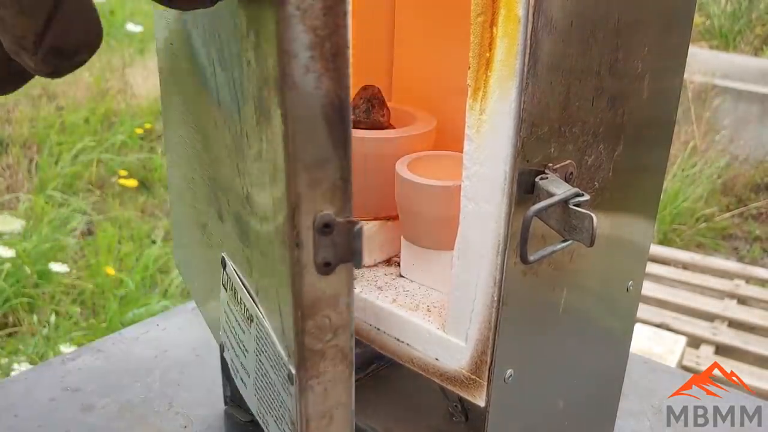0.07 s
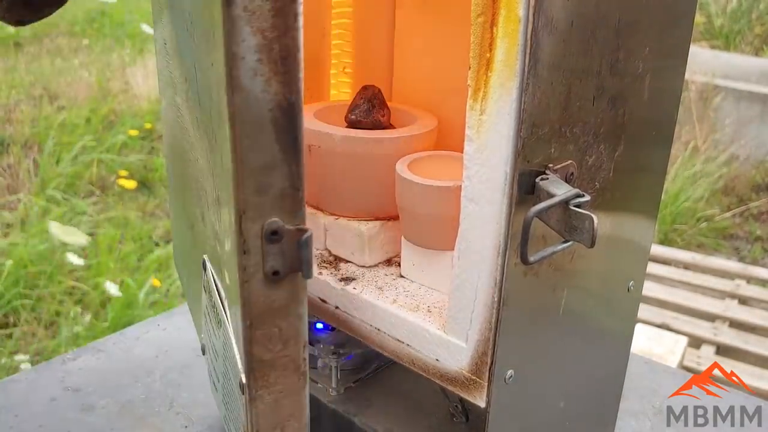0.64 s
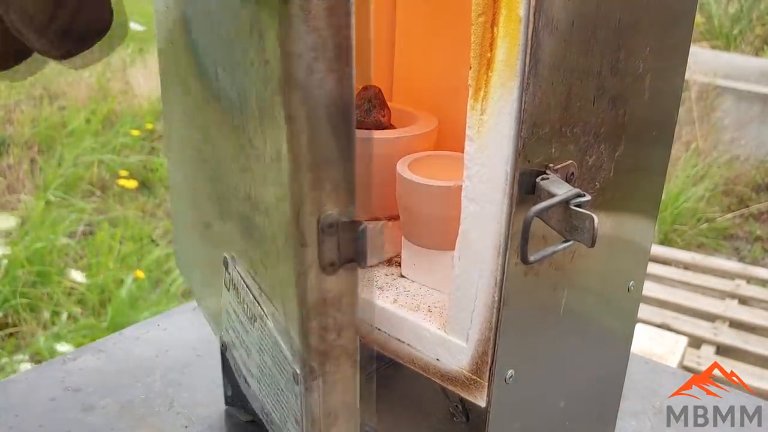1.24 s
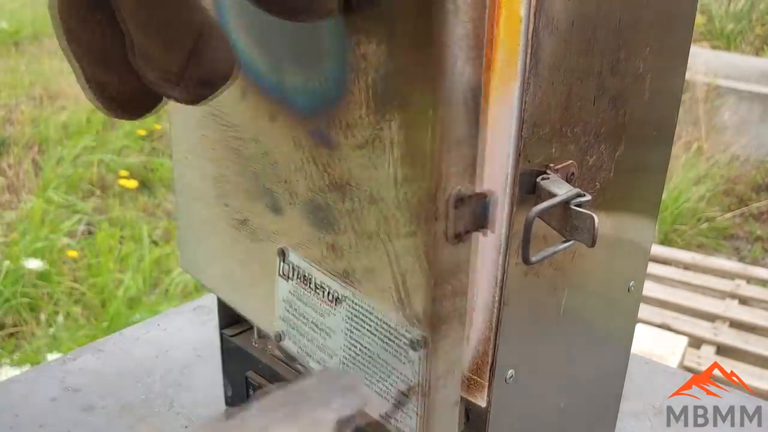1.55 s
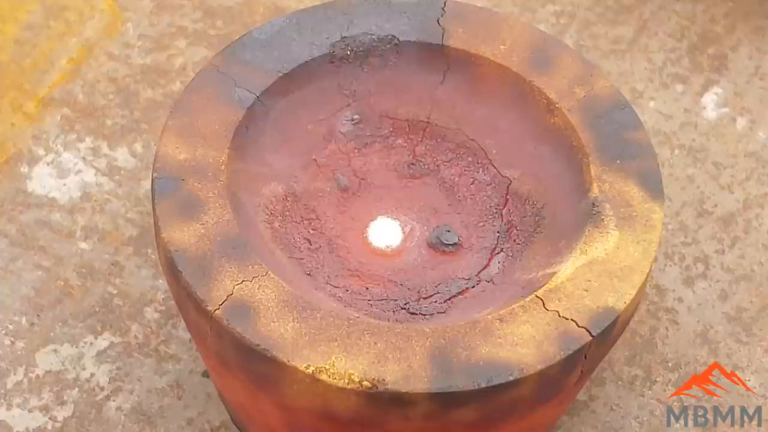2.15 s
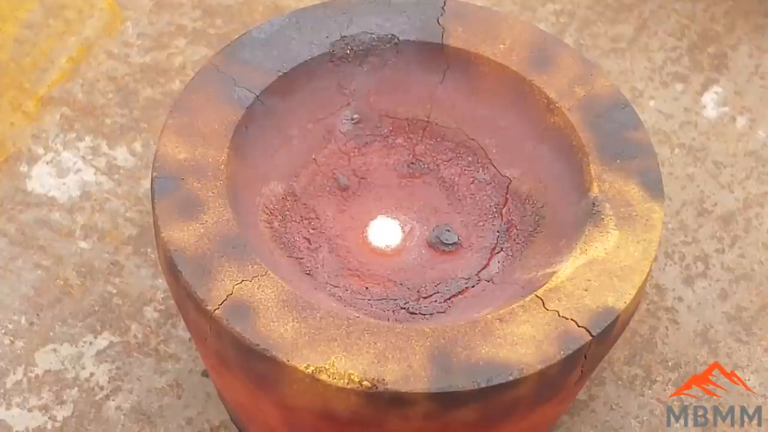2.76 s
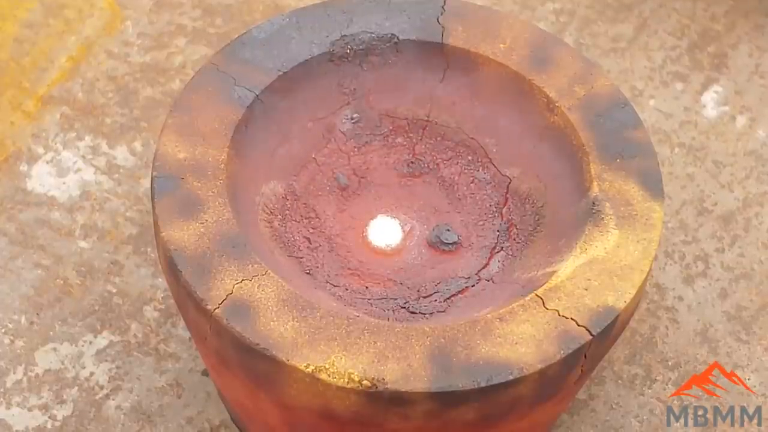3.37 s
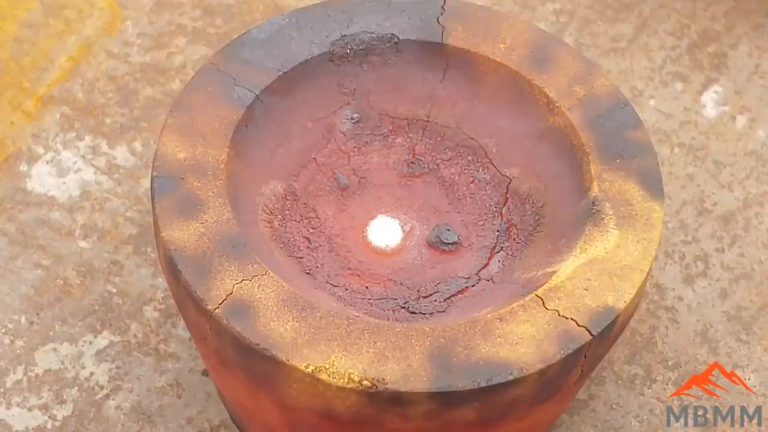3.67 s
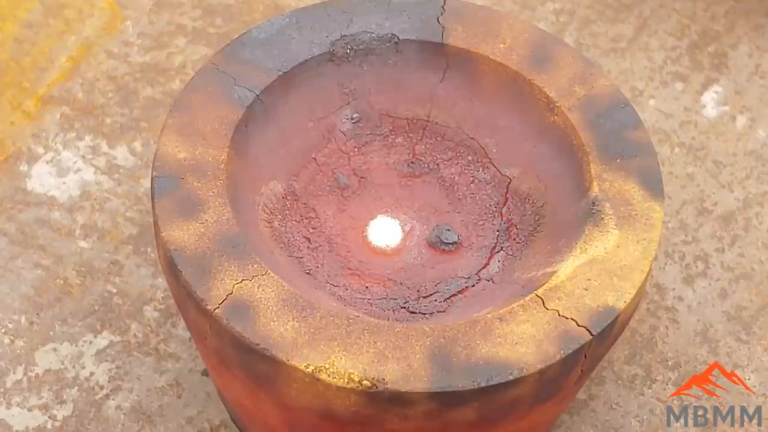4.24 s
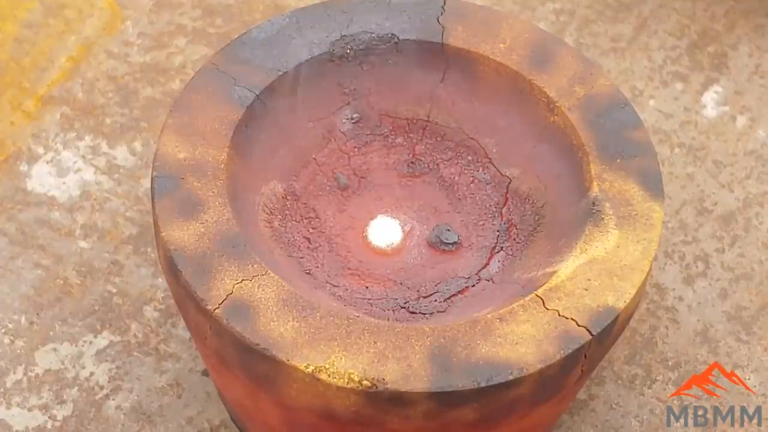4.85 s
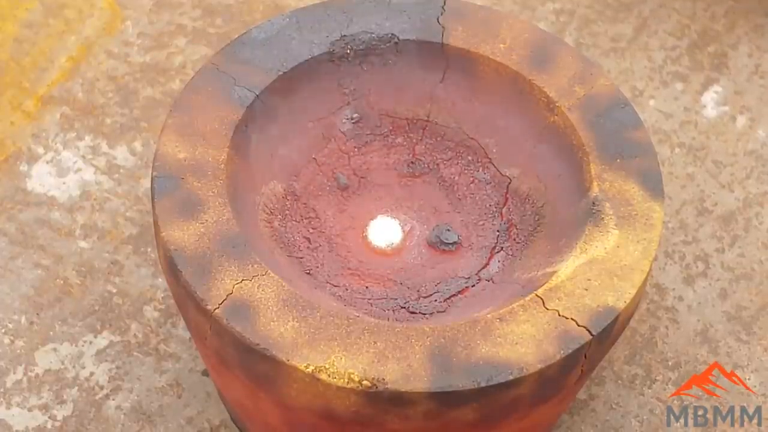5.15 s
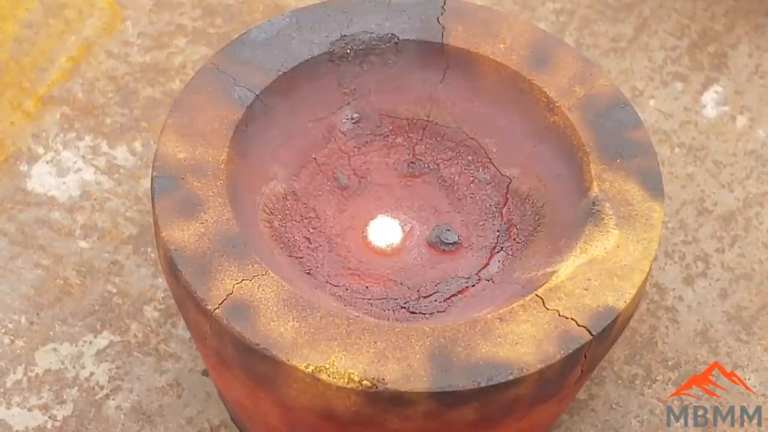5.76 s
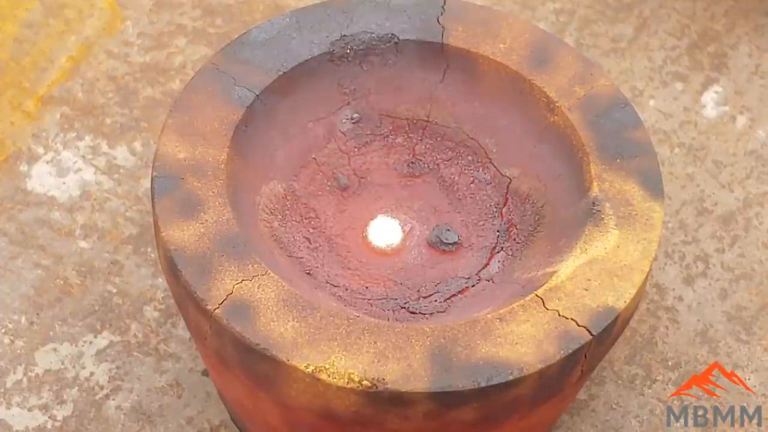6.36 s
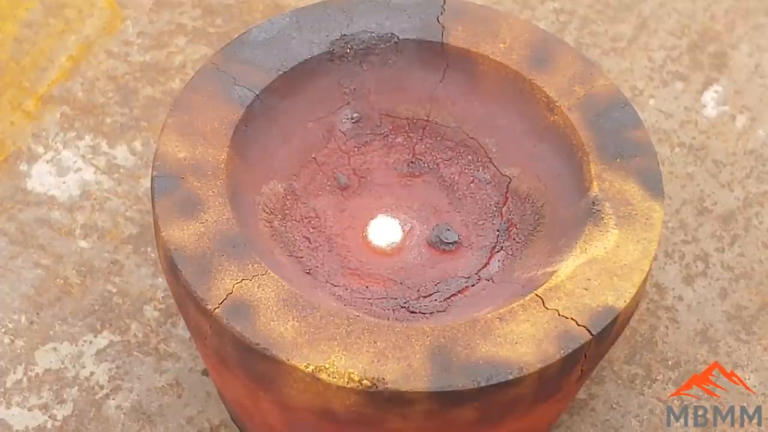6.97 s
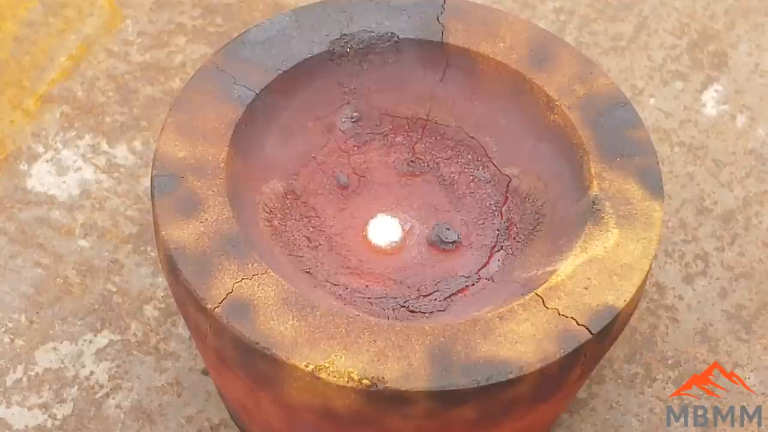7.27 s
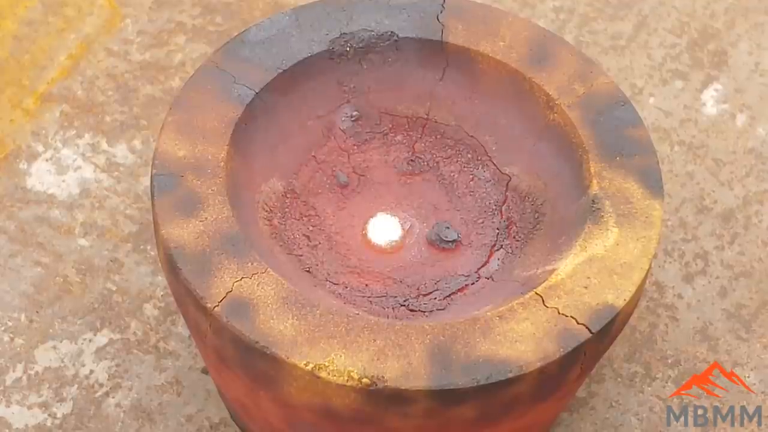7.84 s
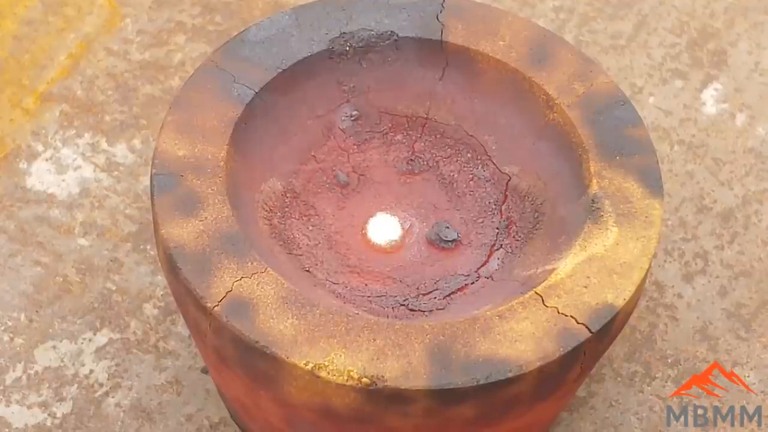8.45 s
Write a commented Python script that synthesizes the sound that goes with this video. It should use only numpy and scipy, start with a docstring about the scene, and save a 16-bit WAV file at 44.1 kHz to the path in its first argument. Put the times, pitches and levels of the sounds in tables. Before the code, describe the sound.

A small furnace's cooling fan whines and hisses in gusty wind, then abruptly becomes a quieter, more distant steady whine.

```python
"""Outdoors, beside a small electric furnace: its seven-blade cooling fan whines and blows hissing air
through a grille, and the door hinge squeaks once. Gusts thump the two microphone ports (left and right),
so a limiter turns the sound down. After about two seconds the scene changes at a stroke to a sheltered
spot over a hot crucible. The same fan is heard farther off: a steady blade hum and thin high whistles,
with a soft low rumble and a few faint chirps."""
import sys
import numpy as np
from scipy import signal
from scipy.fft import rfft, irfft
from scipy.io import wavfile
from scipy.ndimage import uniform_filter1d

SR = 44100
rng = np.random.default_rng(int(sys.argv[2]) if len(sys.argv) > 2 else 0)


def waveform_to_disk(signal):
    """Save audio, clipped to [-1, 1], as 16-bit WAV at the path in sys.argv[1]."""
    frames = np.transpose(np.atleast_2d(signal))
    scaled = np.clip(frames, -1, 1) * 32767
    samples = np.round(scaled).astype(np.int16)
    wavfile.write(sys.argv[1], SR, samples)


N = 375291
TIME = np.arange(N) / SR
FREQS = np.maximum(np.arange(N // 2 + 1) * SR / N, 1)
CHANGE_S = 2.099   # when the place changes
PORT_SPACING_S = .00048   # time sound takes from one port to the other


def from_db(db):
    """Turn decibels into a number to multiply a sound by."""
    return 10 ** (np.asarray(db) / 20)


def in_time(rows):
    """Join a table's points in time with straight lines, one curve per column."""
    times, *columns = np.transpose(rows)
    return np.array([np.interp(TIME, times, column) for column in columns])


def colour(rows):
    """Turn a table of frequencies and levels into a gain for every frequency."""
    hz, *columns = np.transpose(rows)
    return from_db([np.interp(np.log(FREQS), np.log(hz), column) for column in columns])


def white():
    """The spectra of two unrelated noises, each at 0 dB per Hz."""
    return rfft(rng.standard_normal((2, N))) * np.sqrt(SR / 2)


def drift(rate_hz):
    """A smooth random wobble of typical size 1; a higher rate wobbles faster."""
    pole = np.exp(-200 * np.pi * rate_hz / SR)
    noise = rng.standard_normal(N // 100 + 1002)   # one value per 100 samples
    slow = signal.lfilter([1], [1, -2 * pole, pole * pole], noise)[1000:]
    slow /= np.sqrt(np.mean(slow ** 2))
    return np.interp(np.arange(N) / 100, np.arange(len(slow)), slow)


def swell(at_s, half_length_s):
    """A bell-shaped rise and fall of height 1."""
    return np.exp(-np.minimum(((TIME - at_s) / half_length_s) ** 2, 50))


def treble_change(sound, edge_hz, db):
    """Add this to a sound to turn its part above a soft edge up or down by `db`."""
    treble = irfft(rfft(sound) / (1 + (edge_hz / FREQS) ** 8), N)
    return treble * (from_db(db) - 1)


def air_noise(gain, direct, lag_ms):
    """Noise at two ports: the direct share reaches the left one late, the rest comes from all round."""
    delay = np.exp(-2j * np.pi * FREQS * lag_ms / 1000)
    all_round = np.sinc(2 * FREQS * PORT_SPACING_S)
    alike = direct * delay + (1 - direct) * all_round
    right, left_only = white()
    left = alike * right + np.sqrt(np.maximum(1 - abs(alike) ** 2, 0)) * left_only
    return irfft(gain * np.array([left, right]), N)


# How fast the fan spins: (time [s], speed [turns per s])
FAN_SPEED = [(0, 60.42), (2.09, 60.41), (2.11, 60.33), (4.6, 60.365), (8.5, 60.335)]


def shaft_angle():
    """How far the fan has turned, in radians; all its tones follow this."""
    return 2 * np.pi * np.cumsum(in_time(FAN_SPEED)[0]) / SR


def cavity(hz, half_width_hz, left_db, right_db, flutter_db):
    """Swirling air makes a hollow in the housing ring unevenly."""
    gain = from_db([[left_db], [right_db]]) / (1 + ((FREQS - hz) / half_width_hz) ** 2)
    return air_noise(gain, direct=0.86, lag_ms=0.372) * from_db(flutter_db * drift(24))


def fan_tone(angle, per_turn, level_db):
    """A tone with `per_turn` waves in each turn of the fan; moving air shakes high tones more."""
    shake = min(.08 + .0022 * per_turn, .3)
    phase = per_turn * angle + rng.uniform(0, 2 * np.pi)
    port_phases = [phase - per_turn * 0.089, phase]   # the left port hears it a little later
    wave = [(1 + shake * drift(18)) * np.sin(p + shake * drift(6.8)) for p in port_phases]
    return from_db(level_db) * np.array(wave) * np.sqrt(2 / (1 + shake ** 2))


def fan_tones(angle, table):
    """A table's steady tones together; with seven blades, multiples of 7 stand out."""
    return sum(fan_tone(angle, round(per_turn), [[left], [right]]) for per_turn, left, right in table)


# Air through the grille, close by: (frequency [Hz], left and right relative level [dB])
NEAR_HISS = [(1120, -75, -73.5), (2300, -71.5, -72), (3800, -72, -69.5), (5100, -69.5, -78.5),
             (6280, -64, -78.5), (7160, -60.5, -58.5), (7700, -58.5, -58), (8360, -63, -60.5),
             (9140, -70, -60), (9520, -69, -68.5), (10320, -75, -64.5), (11830, -78, -78),
             (14500, -84, -85), (15600, -88.1, -95.4)]
# Fan tones, close by: (pitch [waves per turn], left and right relative level [dB])
NEAR_TONES = [(14, -52, -53), (20, -55, -54), (42, -64, -59), (56, -54, -67), (63, -65, -54),
              (98, -52, -71), (112, -46, -54), (126, -43, -37), (168, -61, -53)]
# The swinging door dulls and brightens the highest sounds: (time [s], level change [dB])
DOOR_SHADE = [(0.08, 3.5), (0.3, -1), (0.8, 2), (1.25, -0.5), (1.6, -0.4), (1.95, 2.5)]
# The blades' steady whine: (level [dB]), left then right
NEAR_WHINE = [
    [-45],
    [-44.5],
]
# The blades' whistle, beamed past the door: (time [s], left level [dB], right level [dB])
NEAR_WHISTLE = [(0.02, -43, -54), (0.43, -36, -40), (0.51, -44, -54), (0.6, -30, -56), (0.83, -33, -54),
                (0.93, -54, -48), (1.62, -46, -49), (1.88, -38, -50), (2.07, -38, -50)]


def near_fan(angle):
    """Bright grille hiss and whistles beside the furnace; the door blocks short waves most."""
    hiss = air_noise(colour(NEAR_HISS), direct=0.17, lag_ms=0.25)
    hiss += cavity(hz=8770, half_width_hz=120, left_db=-103, right_db=-58, flutter_db=4)
    fan = hiss + from_db(1.0) * fan_tones(angle, NEAR_TONES)
    fan += treble_change(fan, edge_hz=7800, db=in_time(DOOR_SHADE))
    whine = fan_tone(angle, per_turn=21, level_db=NEAR_WHINE)
    whistle = fan_tone(angle, per_turn=84, level_db=in_time(NEAR_WHISTLE))
    return from_db(0.65) * fan + whine + whistle


def turbulence(spectrum):
    """Lumps of air pressure of even strength, unrelated at the two ports."""
    lumps = irfft(white() * colour(spectrum), N)
    power = uniform_filter1d(uniform_filter1d(lumps ** 2, size=1500), size=1500)
    return lumps / np.sqrt(power)


# The deep tone of the wind: (frequency [Hz], relative level [dB])
WIND_COLOUR = [(12, -6), (25, -17), (45, 3.5), (75, 1), (130, -2.5), (220, -12.5), (350, -24), (500, -38),
               (900, -48.5), (2000, -106)]
# Wind strength, with lulls at one port or the other: (time [s], left and right relative level [dB])
WIND_STRENGTH = [(0.02, -17.5, -15), (0.62, -5.5, -8), (0.72, -42, -15), (0.82, -13, -10.5),
                 (0.87, -17, -10), (0.97, -5.5, -7.5), (1.34, -10.5, -13.5), (1.47, -6, -1.5),
                 (1.57, -38, -9), (1.64, -15, -11), (1.89, -12.5, -7), (1.94, -12, -39), (1.99, -16, -8.5),
                 (2.07, -10, -6)]


def wind():
    """Air rumbles past the ports; small swirls make its higher part flutter."""
    flow = turbulence(WIND_COLOUR)
    flutter_db = 4 * np.array([drift(13.7), drift(13.7)])
    flow += treble_change(flow, edge_hz=210, db=flutter_db)
    return from_db(in_time(WIND_STRENGTH)) * flow


# The tone of a gust's thud: (frequency [Hz], relative level [dB])
GUST_COLOUR = [(40, 1), (120, 3.5), (250, -1), (380, -7), (550, -16), (800, -24), (1100, -38), (1600, -47),
               (3000, -84)]
# Gusts: (time [s], thud level [dB], half length [s], port [0 left, 1 right], extra rush [dB])
GUSTS = [(0.101, -13.5, 0.03, 1, -11), (0.249, -10.5, 0.053, 1, -19), (0.391, -8, 0.012, 0, -5),
         (0.467, -6, 0.014, 0, 1), (0.565, -11, .03, 0, -6), (0.595, -3.5, 0.022, 1, 3.5),
         (0.638, -2, 0.015, 1, -9), (0.87, 0, 0.024, 1, 5.5), (0.959, -5.5, .011, 0, 2),
         (1.147, -3.5, 0.011, 0, -7), (1.176, -5.5, 0.019, 0, 2), (1.256, -2, 0.0079, 1, -11),
         (1.426, -3.5, 0.0092, 1, 0), (1.448, -12, 0.035, 0, 0), (1.512, -6.5, 0.036, 1, 5),
         (1.594, -4, 0.025, 1, 5.5), (1.631, -2.5, 0.017, 1, 8.5), (1.733, -6, 0.039, 1, 1),
         (1.994, -7, 0.01, 1, 5), (2.013, 2, 0.014, 0, -6), (2.046, -10.5, 0.043, 1, -2.5)]


def gusts():
    """Each big swirl of air hits one port with a thud and a higher rushing sound."""
    thud = turbulence(GUST_COLOUR)
    out = np.zeros((2, N))
    for at_s, level_db, half_length_s, port, rush_db in GUSTS:
        side = int(round(port))
        hit = thud[side] + treble_change(thud[side], edge_hz=470, db=rush_db)
        out[side] += from_db(level_db) * swell(at_s, half_length_s) * hit
    return out


# The tones in the hinge's squeak: (frequency [Hz], left level [dB])
HINGE_TONES = [(3430, -30), (5200, -37), (7000, -21), (8850, -38)]


def hinge():
    """The hinge squeaks once on the left as the door swings to."""
    wobbly_time = np.cumsum(1 + 0.014 * drift(144)) / SR
    squeak = sum(from_db(db) * np.sin(2 * np.pi * hz * wobbly_time) for hz, db in HINGE_TONES)
    return squeak * swell(at_s=1.447, half_length_s=0.005) * from_db([[0], [-14]])


# Air through the grille, farther off: (frequency [Hz], left and right relative level [dB])
FAR_HISS = [(450, -87, -86.5), (1350, -85, -84.5), (1870, -80, -82.5), (2380, -83.5, -77.5),
            (2840, -80, -77.5), (5250, -79, -78.5), (7550, -73.5, -81.5), (7500, -93, -69),
            (8080, -82, -64.5), (8210, -89, -70.5), (11150, -83, -76.5), (13000, -91.5, -86.5),
            (14500, -88, -90.5), (15600, -92, -98)]
# Hollows in the housing: (frequency [Hz], half width [Hz], left and right relative level [dB], flutter [dB])
CAVITIES = [(1835, 16, -79, -74, 3.8), (2630, 38, -73.5, -72.5, 3), (2864, 190, -79.5, -80, 2),
            (6560, 190, -92, -74.5, 2), (7800, 310, -78.5, -73, -5), (7880, 57, -94, -65, -1),
            (8730, 106, -70, -70.5, 2.5)]


def far_hiss():
    """Air hisses through the distant grille and rings the hollows of the housing."""
    bass_cut = FREQS / (FREQS + 60)
    hiss = air_noise(colour(FAR_HISS) * bass_cut, direct=0.29, lag_ms=0.311)
    return hiss + sum(cavity(*row) for row in CAVITIES)


# Fan tones, farther off: (pitch [waves per turn], left and right relative level [dB])
FAR_TONES = [(9, -67, -68), (10, -71, -68), (12, -69, -72), (14, -66, -65), (20, -69, -63), (28, -67, -64),
             (35, -71, -65), (36, -69, -67), (39, -70, -63), (43, -66, -61), (49, -71, -65), (63, -67, -66),
             (70, -75, -62), (84, -51, -52), (91, -65, -68), (112, -61, -53), (119, -59, -57),
             (126, -44, -44), (154, -78, -62), (161, -76, -63), (168, -61, -46), (175, -71, -63),
             (252, -75, -77)]
# The hum of the passing blades: (time [s], left level [dB], right level [dB])
FAR_HUM = [(2.25, -52.0, -57), (5.54, -50, -53), (6.31, -52.0, -55.5), (7.15, -50, -51),
           (8.41, -51.5, -51.5)]
# The blades' whine, swelling and fading: (time [s], left level [dB], right level [dB])
FAR_WHINE = [(2.25, -64.0, -70), (2.81, -56, -63), (3.02, -47.5, -64), (3.86, -75, -59), (4.56, -53.0, -63),
             (4.84, -63, -56), (5.47, -67.0, -58.5), (5.68, -50, -65), (5.96, -56.5, -66),
             (6.24, -59.5, -70), (6.59, -60, -55.5), (7.36, -74, -49), (7.71, -65, -55), (8.41, -68, -62)]
# The top of the hiss dulls near the end: (time [s], level change [dB])
FAR_TREBLE = [(2.2, 0), (5.9, 0), (6.5, 0.5), (6.95, 0.5), (7.25, -3), (7.8, -0.5), (8.4, -1.3)]


def far_fan(angle):
    """The fan from farther off; its treble wavers and then dulls, the highest whistles most."""
    hiss = far_hiss()
    treble_db = in_time(FAR_TREBLE) + 0.37 * drift(1.2)
    hiss += treble_change(hiss, edge_hz=8200, db=treble_db)
    tones = fan_tones(angle, FAR_TONES)
    tones += fan_tone(angle, per_turn=7, level_db=in_time(FAR_HUM))
    tones += fan_tone(angle, per_turn=21, level_db=in_time(FAR_WHINE))
    waver_db = 0.7 * np.array([drift(0.91), drift(1.8)])
    tones += treble_change(tones, edge_hz=6300, db=1.7 * treble_db + waver_db + 1.0)
    return hiss + tones


# The low rumble at the sheltered spot: (frequency [Hz], relative level [dB])
RUMBLE = [(22, -92.7), (35, -83), (55, -73), (68, -73.5), (95, -67), (125, -61.5), (160, -73.5),
          (190, -72.5), (215, -79), (234, -72), (280, -83), (370, -80.5)]


def rumble():
    """A soft rumble whose long waves reach both ports nearly alike."""
    treble_cut = 1 / np.sqrt(1 + (FREQS / 370) ** 8)
    gain = colour(RUMBLE) * treble_cut * from_db([[.5], [-.5]])
    return air_noise(gain, direct=0.28, lag_ms=0.59)


# Faint chirps behind the far fan: (time [s], pitch [Hz], relative level [dB], half length [s])
CHIRPS = [(2.785, 2730, -47, 0.04), (4.544, 2650, -43, 0.024), (4.676, 1850, -54, 0.042),
          (6.02, 2760, -46, .035)]


def chirps():
    """Thin wavering chirps, a little to the right."""
    out = np.zeros(N)
    for at_s, hz, level_db, half_length_s in CHIRPS:
        pitch_hz = hz * (1 + 0.017 * drift(41.6))
        tone = np.sin(2 * np.pi * np.cumsum(pitch_hz) / SR)
        out += from_db(level_db) * swell(at_s, half_length_s) * tone
    return out * from_db([[-1], [3]])


def scene():
    """The windy place, then the sheltered one, with the same fan in both."""
    angle = shaft_angle()
    windy = near_fan(angle) + wind() + gusts() + hinge()
    sheltered = far_fan(angle) + rumble() + chirps()
    changed = .5 + .5 * np.tanh((TIME - CHANGE_S) / .0015)
    return (1 - changed) * windy + changed * sheltered


def limiter(sound, limit_db=-5, share=0.85, detect_s=0.0083, release_db_per_s=34):
    """In the windy place, a gust at either port turns both sides down; they come back up slowly."""
    power = uniform_filter1d(sound ** 2, size=int(detect_s * SR)).max(axis=0)
    level_db = 10 * np.log10(np.maximum(power, 1e-12))
    cut_db = share * np.maximum(level_db - limit_db, 0)
    release_db = release_db_per_s * TIME
    held_db = np.maximum.accumulate(cut_db + release_db) - release_db
    return sound * from_db(-uniform_filter1d(held_db * (TIME < CHANGE_S), size=200))


def record(dry):
    """Turn down the gusts, round off the tallest peaks and cut the very highest sounds."""
    cutoff_hz = 15780
    limited = limiter(dry)
    rounded = limited / (1 + limited ** 6) ** (1 / 6)
    top_cut = .5 - .5 * np.tanh((FREQS - cutoff_hz) / 30)
    return irfft(rfft(rounded) * top_cut, N)


dry = scene()
out = record(dry)
waveform_to_disk(out)
```